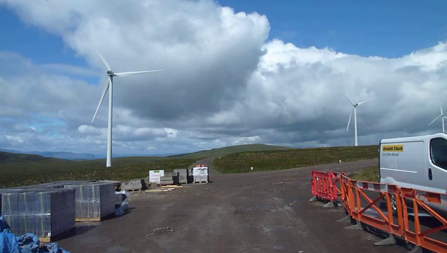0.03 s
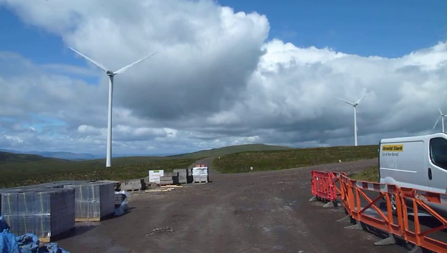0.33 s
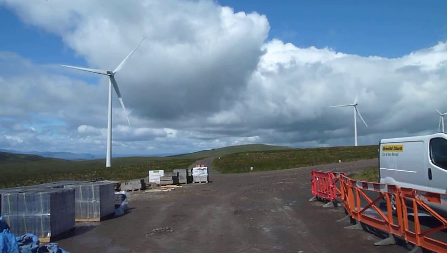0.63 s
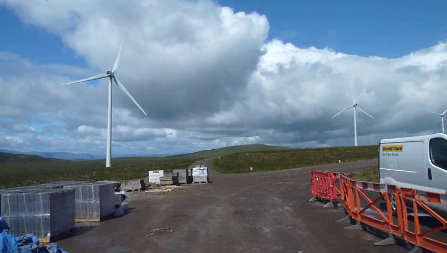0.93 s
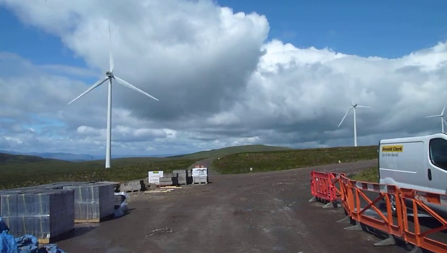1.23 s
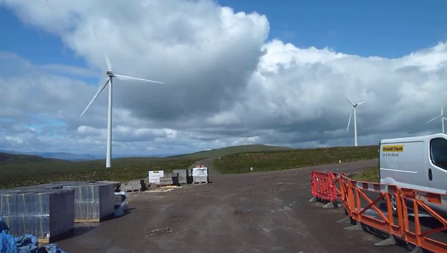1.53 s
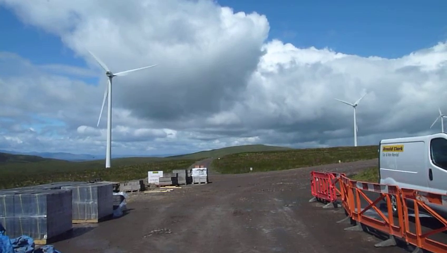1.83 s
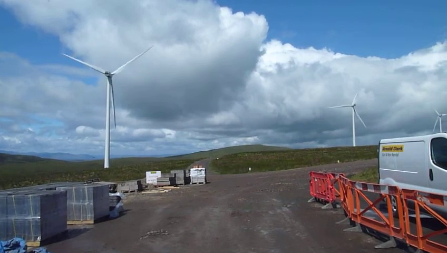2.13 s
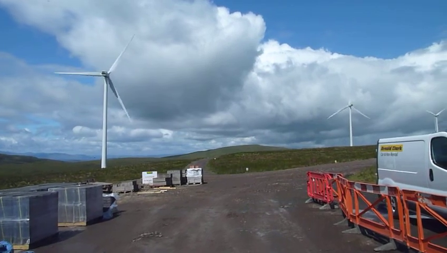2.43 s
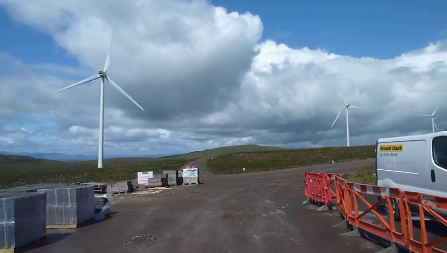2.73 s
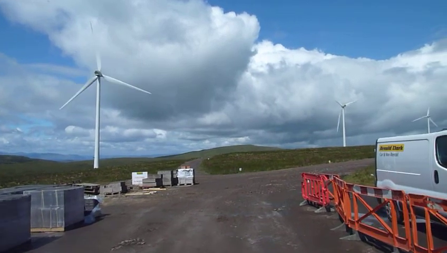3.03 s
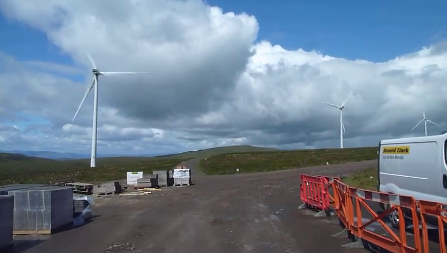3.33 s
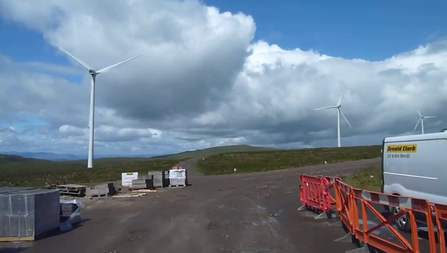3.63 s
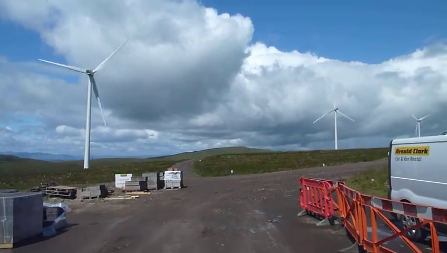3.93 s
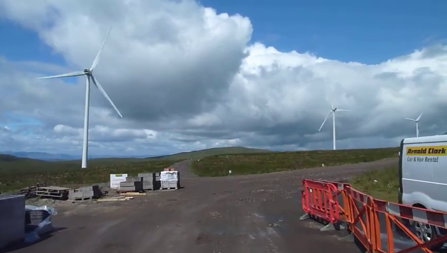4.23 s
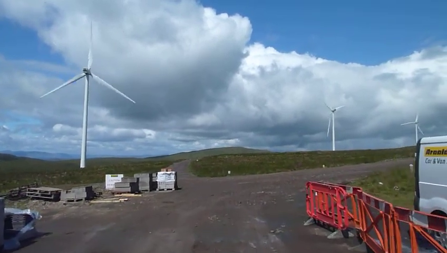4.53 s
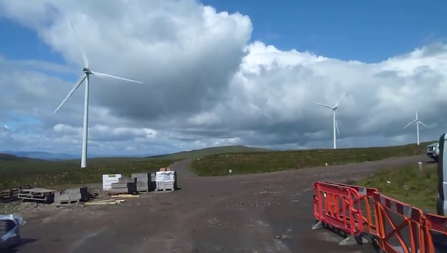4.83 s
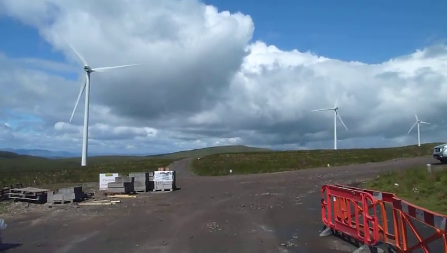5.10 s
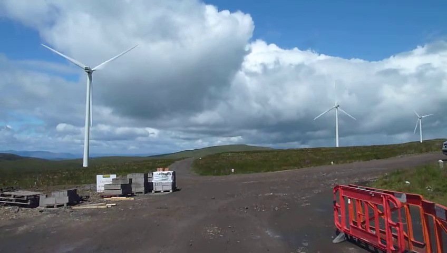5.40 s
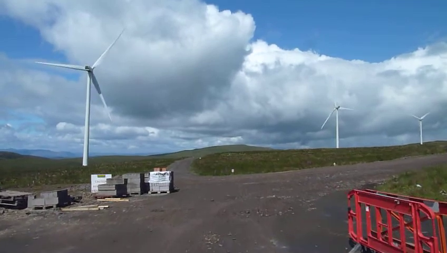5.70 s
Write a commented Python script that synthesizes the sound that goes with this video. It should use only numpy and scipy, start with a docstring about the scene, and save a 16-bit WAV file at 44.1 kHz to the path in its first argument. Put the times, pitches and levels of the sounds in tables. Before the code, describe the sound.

Heard close up from the dashboard, a diesel vehicle pulls away slowly on a gravel track. The sound cuts in with a dull pop, then the engine rises from idle, sags and pulls again over body rumble, tyre crunch, vent hiss and a faint whine. Bumps knock the hollow panel and set loose trim rattling and squeaking. Partway through, a latch clacks four times on the right.

```python
"""Diesel cab on a gravel track

Stereo microphone on the dashboard of a vehicle pulling away slowly. The sound cuts in abruptly with a
short, dull switch-on pop. The engine rises from idle, sags and pulls again; the body rumbles, the tyres
crunch, the vents hiss and something whines under the dashboard. Close by, bumps knock the hollow panel
and set loose trim rattling and squeaking, and a latch clacks four times on the right."""
import sys
import numpy as np
from scipy import signal
from scipy.fft import rfft, irfft
from scipy.io import wavfile
from scipy.ndimage import uniform_filter1d

SR = 44100
rng = np.random.default_rng(int(sys.argv[2]) if len(sys.argv) > 2 else 0)


def waveform_to_disk(signal):
    """Save audio, clipped to [-1, 1], as 16-bit WAV at the path in sys.argv[1]."""
    frames = np.transpose(np.atleast_2d(signal))
    scaled = np.clip(frames, -1, 1) * 32767
    samples = np.round(scaled).astype(np.int16)
    wavfile.write(sys.argv[1], SR, samples)


N = 258426
TIME = np.arange(N) / SR
BINS = np.fft.rfftfreq(N, 1 / SR)
START_S = 0.572

# The dashboard's thud. Each row: frequency in Hz, relative level in dB.
THUD_SPECTRUM = [(40, -17), (100, -11), (186, 3.5), (240, 2.5), (320, -1), (395, -5.5), (448, -2),
                 (485, -3), (530, -2), (650, -5.5), (900, -13.5), (1500, -17.5), (4000, -41)]
# The bright tick of trim and latch. Each row: frequency in Hz, relative level in dB.
TICK_SPECTRUM = [(1000, -32), (2400, -1.5), (3500, 2.5), (4800, 2), (6000, -2), (6900, -4), (8000, -27)]
# The latch's clacks. Each row: start in seconds, ring, thud and tick levels in dB, echo t60 in seconds.
LATCH_CLACKS = [(1.833, -33.5, -24.5, -45.5, 0.34), (2.167, -35, -29.5, -44.5, 0.3),
                (2.492, -36, -25, -45, 0.32), (2.816, -35, -29.5, -42.5, 0.36)]


def gain_of(db):
    """Decibels to amplitude."""
    return 10 ** (np.asarray(db) / 20)


def unit_rms(x):
    """Scales to rms 1."""
    return x / np.sqrt(np.mean(x ** 2) + 1e-20)


def on_bins(rows):
    """A spectrum table at every frequency bin."""
    hz, value = np.transpose(rows)
    return np.interp(np.log(BINS + 1), np.log(hz + 1), value)


def follow(rows):
    """Each column of a curve table at every sample."""
    times, *columns = np.transpose(rows)
    return [np.interp(TIME, times, column) for column in columns]


def wander(rate):
    """Random drift at rms 1, up to about rate changes a second."""
    return unit_rms(irfft(rfft(rng.standard_normal(N)) / (1 + (BINS / rate) ** 4), N))


def stereo_noise(gain, lean=0.98, grit_db=0.0):
    """Cabin noise at the microphone: alike in the bass, diffuse in the treble, grainy with grit."""
    # Each row: frequency in Hz, correlation of left and right.
    likeness = [(25, 0.92), (60, 0.99), (130, 1), (300, 1), (550, 0.97), (1000, 0.84), (2000, 0.58),
                (4000, 0.15), (7000, .45)]
    # Each row: frequency in Hz, left minus right in dB at a lean of 1.
    balance = [(30, -0.5), (125, 0), (270, 0.13), (600, -1.6), (1100, -0.5), (2200, -4.5), (4000, -6.5),
               (7000, -3.5)]
    grains = gain_of(grit_db * wander(370))
    a, b = rfft(rng.standard_normal((2, N)) * grains)
    alike = on_bins(likeness)
    mid, side = np.sqrt(1 + alike) * a, np.sqrt(1 - alike) * b
    tilt = gain_of(lean * on_bins(balance) / 2)
    both = irfft(np.array([(mid + side) * tilt, (mid - side) / tilt]) * gain, N)
    return both / np.std(both.mean(0))


def blow(start, db, t60, rise):
    """The envelope of one blow: a quick rise and an exponential fall."""
    age = np.maximum(TIME - start, 0)
    return gain_of(db - 60 * age / t60) * (1 - np.exp(-age / rise))


def swell(centre, db, length):
    """A smooth rise and fall around a moment."""
    return gain_of(db) * np.exp(-(2 * (TIME - centre) / length) ** 2)


def panned(db):
    """Channel gains for a level difference, left minus right."""
    return gain_of(np.array([[db], [-db]]) / 2)


def switch_on_pop(hz=304):
    """A short, dull pop as the sound cuts in: one low tone that dies at once."""
    envelope = blow(START_S, db=-10.5, t60=0.019, rise=0.00039)
    return envelope * np.sqrt(2) * np.sin(2 * np.pi * hz * (TIME - START_S))


def cabin_resonance(hz):
    """How strongly the cabin answers a low tone of this pitch."""
    # Each row: resonance in Hz, width in Hz, peak gain in dB.
    modes = [(69.6, 6.9, -32), (96, 11, -34), (117.5, 25.7, -34.5), (155, 3.4, -40), (193, 15, -43),
             (214, 6.1, -38)]
    return sum(gain_of(db) / (1 + (2 * (hz - centre) / width) ** 2) for centre, width, db in modes)


def engine(firings, firing_hz, load_db, rumble_db, smooth_hz=46.7, bite=0.04):
    """The firing boom; low orders swell in the cabin's resonances, higher ones brighten with load."""
    # The boom. Each row: time in seconds, relative level in dB.
    boom_curve = [(0.6, -43.5), (1.24, -38.5), (1.35, -31.5), (1.62, -37.5), (1.86, -39), (1.98, -30.5),
                  (2.58, -32), (3.05, -37), (3.35, -36.5), (3.5, -31.5), (3.78, -38), (4.02, -34),
                  (4.62, -40), (4.85, -42), (5.4, -43), (5.74, -30), (5.86, -31.5)]
    # Each row: multiple of the firing rate, relative level in dB.
    low_orders = [(2, -5.5), (3, 0), (4, -2.5)]
    # Weaker orders, same columns; the halves come from unequal cylinders.
    upper_orders = [(2.5, -25.5), (4.5, -8), (5, -3.5), (5.5, -16.5), (6, 1), (6.5, -7), (7, -4), (8, -1),
                    (9, -7), (10, -8), (10.5, -4.5), (11, -10.5), (11.5, -11), (12, -35), (16, -11.5),
                    (18, -17.5), (18.5, -21.5), (19, -26)]

    def order(k, flutter, phase=0):
        angle = 2 * np.pi * (k * firings + rng.random()) + phase
        in_phase = (1 + flutter * wander(5.9)) * np.cos(angle)
        return np.sqrt(2) * (in_phase + flutter * wander(5.6) * np.sin(angle))

    boom_db, = follow(boom_curve)
    stumble = 0.039 + 0.014 * np.maximum(smooth_hz - firing_hz, 0)  # grows as the engine lugs
    boom = gain_of(boom_db + 0.94) * order(1, stumble, phase=np.array([[0.035], [-0.035]]))
    low = sum(gain_of(db + load_db) * cabin_resonance(k * firing_hz) * order(k, flutter=0.37)
              for k, db in low_orders)
    upper = sum(gain_of(db + bite * k * (load_db - 3.5)) * order(k, flutter=0.22)
                for k, db in upper_orders)
    return boom + low + gain_of(rumble_db - 11) * upper


def standing_waves():
    """The cabin's standing waves: narrow peaks and dips of about 1 dB over the middle and treble."""
    ripple = unit_rms(uniform_filter1d(rng.standard_normal(len(BINS)), size=260))
    return gain_of(ripple * BINS / (BINS + 400))


def road(firings, rumble_db, roar_db, hiss_db):
    """Body rumble and tyre roar, both throbbing with each firing, under a finer hiss of grit and air."""
    # Three spectra. Each row: frequency in Hz, relative level in dB.
    body_spectrum = [(20, -18.5), (40, -19), (62, -9), (85, -4), (110, 0), (150, -3.5), (198, 4.5),
                     (230, -1.5), (272, 1.5), (350, -10), (455, -10.5), (620, -18), (1000, -31.5),
                     (2500, -64.5)]
    tyre_spectrum = [(200, -15), (420, 4), (540, -2.5), (650, 0), (880, -2.5), (1050, -7), (1250, -8),
                     (1550, -5.5), (2100, -22.5), (2700, -14), (4000, -19), (8000, -35.5)]
    hiss_spectrum = [(500, -17), (1200, 0.5), (2000, 8.5), (2800, 6), (3800, 2.5), (4700, 5), (5600, 3.5),
                     (6900, 0.5), (7400, -8.5), (8000, -34.5)]
    throb = np.cos(2 * np.pi * firings)
    waves = standing_waves()
    body = stereo_noise(gain_of(on_bins(body_spectrum)))
    body *= gain_of(rumble_db) * (1 + 0.24 * throb)
    tyres = stereo_noise(gain_of(on_bins(tyre_spectrum)) * waves, grit_db=0.42)
    tyres *= gain_of(roar_db + 0.29 * wander(25)) * (1 + 0.046 * throb)
    hiss = stereo_noise(gain_of(on_bins(hiss_spectrum)) * waves, grit_db=1.6)
    hiss *= gain_of(hiss_db + 0.17 * wander(30))
    return body + tyres + hiss


def wallow(level_db=-45):
    """The whole body wallows on its springs: a deep, uneven rumble."""
    # Each row: frequency in Hz, relative level in dB.
    spectrum = [(12, -2.5), (22, 7.5), (40, 0.5), (55, -1), (80, -11), (150, -33.5), (400, -73.5)]
    return gain_of(level_db + 1.6 * wander(2)) * stereo_noise(gain_of(on_bins(spectrum)))


def whine(load_db):
    """A thin, nearly steady tone under the dashboard whose level follows the load."""
    # Each row: time in seconds, pitch in Hz, level in dB at a load of 0 dB.
    curve = [(0.6, 550.6, -38.5), (1.4, 546.6, -44.5), (2.35, 544.5, -45), (2.9, 545.4, -39.5),
             (3.42, 546, -45), (3.62, 542, -52.5), (3.95, 541, -46), (4.3, 544.5, -59)]
    hz, level_db = follow(curve)
    angle = 2 * np.pi * np.cumsum(hz + 0.7 * wander(10)) / SR
    return gain_of(level_db + load_db + wander(5)) * np.sqrt(2) * np.sin(angle)


def loose_trim(chatter_per_s=2.3):
    """Loose plastic rattles on bumps and chatters faintly between them; the dashboard thuds under it."""
    # Each row: start in seconds, rattle and thud levels in dB, rise and t60 in seconds,
    # left minus right in dB, relative brightness in dB.
    rattles = [(0.663, -46, -31, .004, 0.069, 0, 10.5), (0.728, -35.5, -24, 0.0048, 0.11, 0, -18),
               (0.749, -26.5, -20, 0.0083, 0.075, 0, -14), (0.808, -40, -31, .001, 0.04, -3, -18),
               (0.952, -54, -32, .001, 0.038, 0, -11), (1.0315, -33.5, -23.5, .0008, 0.057, 0.5, 4),
               (1.334, -49, -37, 0.00089, 0.03, 7, 10.5), (1.369, -47.5, -51, .001, 0.037, 1, 12.5),
               (1.509, -43.5, -37.5, 0.0012, 0.15, -4, -29), (2.799, -38, -24, 0.0011, 0.14, -8, -2),
               (2.822, -43, -22, .001, 0.068, -16, -2), (2.834, -42.5, -23.5, 0.012, 0.32, -4, 5),
               (3.615, -48.5, -45, .001, .05, -4, 4), (3.695, -49.5, -36, .001, 0.081, -7, 3.5),
               (3.859, -44, -40, .0005, .02, -7, 0), (3.904, -44.5, -38, 0.00049, 0.026, -9.5, 4.5),
               (4.288, -42.5, -53, 0.0027, 0.11, -5, -2), (4.468, -36, -25.5, 0.004, 0.16, 2, -2.5),
               (4.502, -57, -38, 0.0021, .15, 0, 12), (4.563, -36.5, -26, 0.003, 0.22, -1, 4),
               (4.579, -43, -36, 0.0036, 0.075, 1, 0), (4.603, -33, -33, 0.0094, .13, 0, -23),
               (4.678, -45, -36, 0.00091, 0.044, -3, 0), (5.4, -55, -31.5, 0.00097, 0.072, 0, -18),
               (5.46, -47.5, -40, 0.0035, 0.22, -6, 5), (5.558, -38, -26, 0.00057, 0.04, 1, -28)]
    # The midrange clatter. Each row: frequency in Hz, relative level in dB.
    clatter_spectrum = [(200, -24), (600, -4.5), (1000, 0.5), (1800, 8.5), (2600, 0), (4000, -4),
                        (6000, -15.5), (8000, -19.5)]
    gaps, weakness = rng.random((24, 2)).T
    starts = START_S + np.cumsum(-np.log(1 - gaps)) / chatter_per_s
    chatter = [(start, -53 - 4 * weak, -42 - 4 * weak, 0.001, 0.069, -3, 0)
               for start, weak in zip(starts, weakness) if start < TIME[-1]]
    clatter, ticks, thuds = np.zeros((2, N)), np.zeros((2, N)), np.zeros(N)
    for start, db, thud_db, rise, t60, pan_db, bright_db in list(rattles) + chatter:
        shaking = blow(start, db, t60, rise) * panned(pan_db)
        clatter += shaking
        ticks += shaking * gain_of(bright_db - 3)
        thuds += blow(start, thud_db, t60, rise + 0.0014)
    waves = standing_waves()
    clatter *= stereo_noise(gain_of(on_bins(clatter_spectrum)) * waves, lean=0, grit_db=2.2)
    ticks *= stereo_noise(gain_of(on_bins(TICK_SPECTRUM)) * waves, lean=0, grit_db=2.2)
    return clatter + ticks + thuds * stereo_noise(gain_of(on_bins(THUD_SPECTRUM)))


def dashboard_knocks():
    """A jolt rings the hollow dashboard; the harder the contact, the more its upper modes sound."""
    # Each row: start in seconds, level in dB, hardness in dB per octave.
    jolts = [(0.742, -27.5, 0), (0.754, -27, 5), (2.799, -24.5, 18), (2.84, -19.5, 4), (2.859, -19, 1),
             (4.568, -23, 2), (4.581, -25, -4), (4.611, -26.5, 11.5), (5.558, -35, -1)]
    # Each row: frequency in Hz, relative level in dB, t60 in seconds.
    panel_modes = [(197, -3, 0.12), (457.7, -5.5, 0.25), (519.3, -5, 0.093), (794, -18.5, 0.04),
                   (898, -22, 0.093)]
    t = TIME[:SR // 4]
    out = np.zeros(N)
    for start, db, hardness in jolts:
        for hz, mode_db, t60 in panel_modes:
            tilt_db = hardness * np.log2(hz / 450)
            envelope = gain_of(db + mode_db + tilt_db - 60 * t / t60)
            detune = rng.uniform(0.98, 1.02)
            out[round(start * SR):][:len(t)] += envelope * np.sin(2 * np.pi * hz * detune * t)
    return out


def ruts():
    """A few slow cycles of the body as a wheel drops."""
    # Each row: centre in seconds, level in dB, pitch in Hz, length in seconds.
    drops = [(0.761, -30, 124, 0.037), (0.988, -29.5, 196, 0.034), (2.077, -24, 106.8, 0.042),
             (2.847, -23.5, 190, 0.047), (2.953, -29, 196, 0.056), (4.59, -31, 164.4, 0.058),
             (5.141, -38.5, 65.7, 0.056)]
    return sum(swell(centre, db, length) * np.sqrt(2) * np.cos(2 * np.pi * (hz * TIME + rng.random()))
               for centre, db, hz, length in drops)


def squeaks(pan_db=-3):
    """Plastic rubs in one resonance, on the right: a scrape, or a pure tone when it slips evenly. One very
    short row is instead a bright crack that goes with the latch's fourth clack."""
    # Each row: centre in seconds, level in dB, pitch and width in Hz, length in seconds, pure tone's share of
    # the power from 0 to 1. The row at 2.824 s is the bright crack of the fourth clack.
    rubs = [(0.762, -42.5, 5850, 500, 0.022, 0.02), (2.824, -33, 3180, 200, 0.0049, 0.5),
            (3.36, -46.5, 6320, 600, 0.076, 0.08), (3.951, -49, 2969, 450, .026, 0.04),
            (5.274, -45.5, 3814, 70.1, 0.034, 0.71), (5.338, -58, 6970, 298, 0.056, 0.09),
            (5.477, -46, 2580, 320, 0.027, 0.04)]
    out = np.zeros((2, N))
    for centre, db, hz, width, length, pure in rubs:
        envelope = swell(centre, 0, length)
        scrape = envelope * stereo_noise(1 / (1 + ((BINS - hz) / width) ** 2), lean=0.89)
        scrape *= np.std(envelope) / np.std(scrape)
        tone = envelope * np.sqrt(2) * np.sin(2 * np.pi * hz * TIME) * panned(pan_db)
        out += gain_of(db) * (np.sqrt(1 - pure) * scrape + np.sqrt(pure) * tone)
    return out


def gears(firings, firing_hz, load_db, full_hz=47.63, db_per_hz=1.95):
    """The belt drive and timing gears sing when the engine runs fast under load."""
    # Each row: multiple of the firing rate, level in dB at top speed and a load of 0 dB.
    tones = [(6.67, -39), (8, -45.5), (18, -46), (18.5, -57), (19, -52)]
    drive_db = db_per_hz * np.minimum(firing_hz - full_hz, 0) + 1.8 * load_db
    out = np.zeros(N)
    for k, db in tones:
        level = gain_of(db + drive_db + 2 * wander(4.7))
        out += level * np.sqrt(2) * np.sin(2 * np.pi * (k * firings + rng.random()))
    return out


def latch_ring(t, contact_hz=3600):
    """The latch's modes; neighbours swing in opposite senses, and the padded contact dulls the top."""
    # Each row: frequency in Hz, width in Hz, relative level in dB.
    modes = [(807, 59, 2), (1300, 72, 0.5), (1426, 50, 2.5), (1534, 60, -0.5), (1670, 31, -2.5),
             (1734, 35, -1), (1856, 67, 3), (2052, 27, 5), (2320, 35, -7), (2460, 44, 1), (2527, 30, 3.5),
             (2605, 67, -4), (2737, 45, 1.5), (3210, 500, -8)]
    ring = sum((-1) ** k * gain_of(db) * width * np.exp(-np.pi * width * t) * np.sin(2 * np.pi * hz * t)
               for k, (hz, width, db) in enumerate(modes))
    return signal.lfilter(*signal.butter(2, contact_hz, fs=SR), ring)


def latch(stop_delay_s=0.0085, thud_delay_s=0.01, echo_rise_s=0.004, hum_hz=544, pan_db=-7):
    """The bolt's release and stop ring the latch; the cabin echoes and the dashboard thuds and hums."""
    t = TIME[:SR // 3]
    ring = latch_ring(t)
    strikes = np.zeros((2, len(t)))
    strikes[:, 0] = gain_of(-6)  # the bolt slips free
    strikes[:, round(stop_delay_s * SR)] = gain_of(-4)  # and hits its stop
    clacks = np.zeros((2, N))
    for start, db, _, _, t60 in LATCH_CLACKS:
        fade = gain_of(-60 * t / t60) * (1 - np.exp(-t / echo_rise_s))
        shared = 1.2 * rng.standard_normal(len(t))  # echoes are partly alike in both channels
        echoes = (shared + rng.standard_normal(strikes.shape)) * fade
        echoes *= gain_of(4) / np.linalg.norm(echoes[0])
        clack = signal.fftconvolve(strikes + echoes, ring[None], axes=1)[:, :len(t)]
        clacks[:, round(start * SR):][:, :len(t)] += gain_of(db) * clack / clack[:, :SR // 30].std()
    ticks, thuds, hums = np.zeros((3, N))
    for start, _, thud_db, tick_db, _ in LATCH_CLACKS:
        ticks += blow(start, tick_db, t60=0.44, rise=0.005)
        thuds += blow(start + thud_delay_s, thud_db, t60=0.37, rise=0.0021)
        hum = np.sin(2 * np.pi * (hum_hz * TIME + rng.random()))
        hums += blow(start + thud_delay_s, thud_db - 3.5, t60=0.23, rise=0.011) * hum
    tick_noise = stereo_noise(gain_of(on_bins(TICK_SPECTRUM)), lean=2.6, grit_db=1.7)
    thud_noise = stereo_noise(gain_of(on_bins(THUD_SPECTRUM)))
    return clacks * panned(pan_db) + ticks * tick_noise + thuds * thud_noise + hums


def bolt_cracks(rise_s=0.0003, decay_s=0.0055, pan_db=-5):
    """Each clack starts with the bolt's dry cracks: a dull release, a brighter stop and two rebounds."""
    # Each row: delay in seconds, low and high band edges in Hz, level over the latch's ring in dB.
    contacts = [(0, 1500, 2450, 6), (.0085, 1400, 2900, 0.5), (.021, 1700, 2750, -4.5),
                (.034, 1900, 2850, -4)]
    t = TIME[:SR // 25]
    envelope = np.exp(-t / decay_s) * (1 - np.exp(-t / rise_s))
    out = np.zeros((2, N))
    for start, db, *_ in LATCH_CLACKS:
        for delay, low_hz, high_hz, over_db in contacts:
            band = signal.butter(3, [low_hz, high_hz], "bandpass", fs=SR, output="sos")
            grit = 2 * rng.standard_normal(len(t)) + rng.standard_normal((2, len(t)))
            crack = signal.sosfilt(band, grit * envelope)
            crack /= crack[:, t < decay_s].std()
            out[:, round((start + delay) * SR):][:, :len(t)] += gain_of(db + over_db) * crack
    return out * panned(pan_db)


def scene():
    """The cabin from the dashboard; engine speed, load and the track shape the engine and road noise."""
    # Engine speed. Each row: time in seconds, firings per second.
    speed = [(0.6, 24.8), (1.1, 28.4), (1.33, 34), (1.55, 42.1), (1.76, 46.4), (2.0, 45.7), (2.3, 48.7),
             (2.6, 47.7), (2.85, 46.6), (3.15, 44.1), (3.5, 37.4), (3.78, 31.6), (4.05, 35.8), (4.35, 32.3),
             (4.6, 40.4), (4.9, 42), (5.3, 45.5), (5.86, 47)]
    # How hard the vehicle pulls, with two lifts of the pedal. Each row: time in seconds, load in dB.
    load = [(0.6, -3), (1.15, -4), (1.35, -2.5), (1.42, -13), (1.66, -2.5), (2.0, 0.5), (2.36, -4),
            (2.72, -3), (2.9, -2), (3.36, 1), (3.6, -7), (3.9, -6), (4.14, -11.5), (4.24, -5.5),
            (4.76, -4.5), (5.18, -4), (5.55, -7.5), (5.86, -4)]
    # The track grows smoother. Each row: time in seconds, body rumble and tyre roar in dB at 0 dB load.
    track = [(0.6, -27.5, -40.5), (1.05, -28.5, -40), (1.5, -32, -40), (2.0, -34, -39.5), (2.4, -34, -40),
             (3.4, -34, -40.5), (3.7, -33.5, -44), (4.15, -34.5, -40.5), (4.8, -35, -44.5),
             (5.25, -34, -41.5), (5.4, -37.5, -43), (5.86, -36, -43)]
    # Patches under the tyres. Each row: centre in seconds, change of rumble in dB, length in seconds.
    patches = [(1.002, 1, 0.067), (1.309, 3.5, 0.046), (1.58, 4.5, 0.086), (1.88, 5, 0.31),
               (2.616, 3, 0.028), (2.865, 3.5, 0.28), (3.86, 1.5, 0.099), (4.278, -1, 0.044),
               (4.393, 9.5, 0.019), (4.59, 4.5, 0.17), (4.841, 4, 0.056), (5.24, 3, 0.13)]
    firing_hz, = follow(speed)
    load_db, = follow(load)
    body_db, gravel_db = follow(track)
    firings = np.cumsum(firing_hz) / SR
    patch_db = sum(db * swell(centre, 0, length) for centre, db, length in patches)
    rumble_db = body_db + 0.62 * load_db + patch_db
    roar_db = gravel_db + 0.99 * load_db + 0.6 * patch_db
    rolling = road(firings, rumble_db, roar_db, hiss_db=-48.5 + 0.99 * load_db)
    motor = engine(firings, firing_hz, load_db, rumble_db) + gears(firings, firing_hz, load_db)
    steady = motor + rolling + wallow() + whine(load_db)
    return steady + latch() + bolt_cracks() + loose_trim() + dashboard_knocks() + ruts() + squeaks()


def record(dry):
    """The sound cuts in abruptly with a switch-on pop; the treble is cut off at 7900 Hz."""
    switched = (dry + switch_on_pop()) * np.clip((TIME - START_S) / 0.002, 0, 1)
    lowpass = signal.firwin(255, 7900, window=("kaiser", 9), fs=SR)
    return signal.oaconvolve(switched, lowpass[None], "same")


dry = scene()
out = record(dry)
waveform_to_disk(out)
```